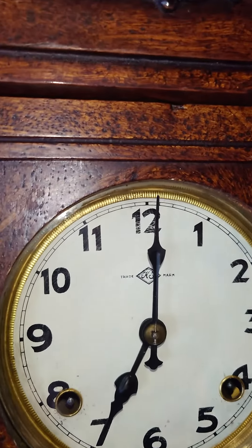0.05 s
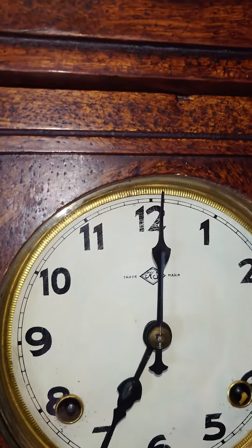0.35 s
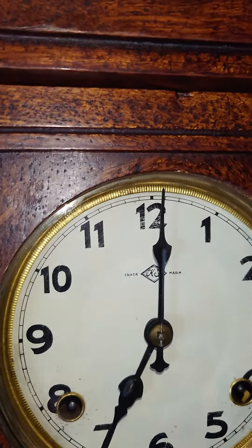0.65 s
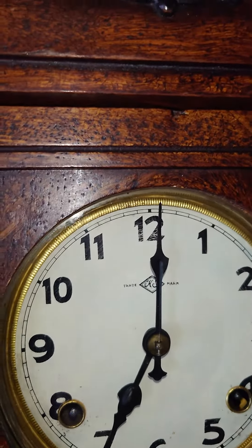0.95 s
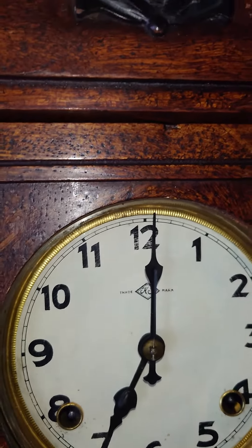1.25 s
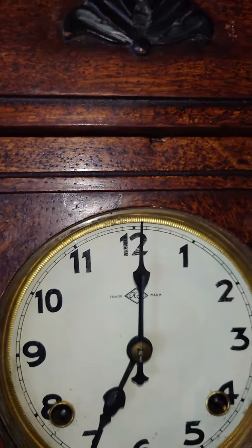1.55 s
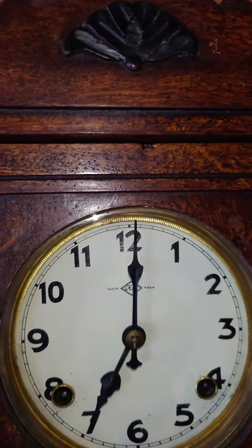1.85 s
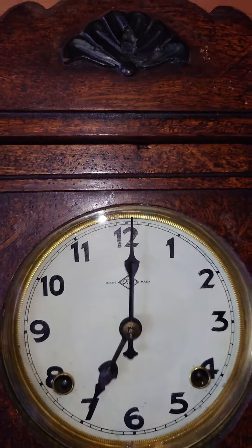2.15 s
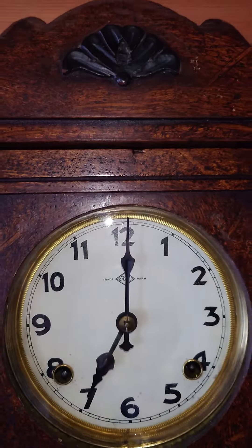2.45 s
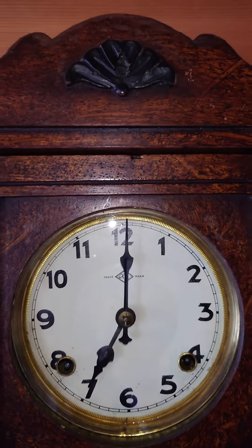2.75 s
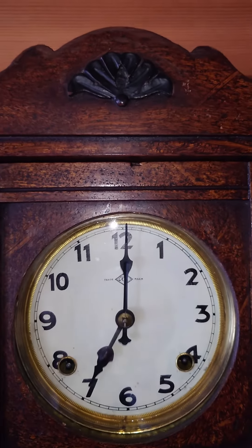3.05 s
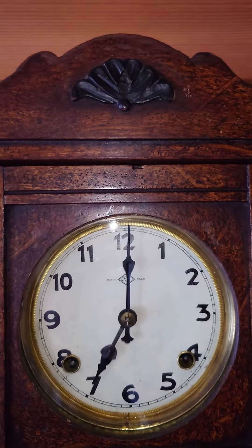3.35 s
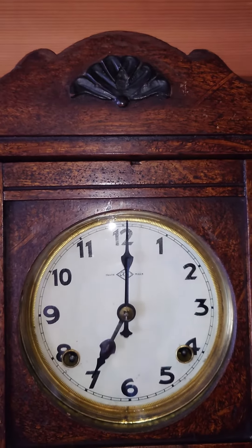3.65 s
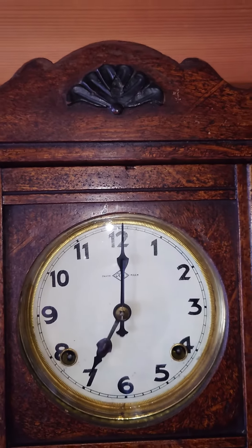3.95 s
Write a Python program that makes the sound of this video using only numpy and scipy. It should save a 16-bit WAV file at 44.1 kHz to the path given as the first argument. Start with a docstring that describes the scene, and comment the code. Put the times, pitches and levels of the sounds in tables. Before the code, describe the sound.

An old wall clock whirs, then strikes twice with ringing metallic tones.

```python
"""A small, quiet room, a stereo microphone close to an old wooden wall clock, a little to the right.
A lever drops, and the striking train spins up against its air brake and whirs, its teeth tapping
a steel pinion. A padded hammer strikes twice on the coiled wire gong: each blow knocks the case,
and the coil sizzles briefly and rings on with a long ladder of inharmonic partials."""
import sys
import numpy as np
from scipy import signal
from scipy.fft import rfft, irfft
from scipy.io import wavfile

SR = 44100
rng = np.random.default_rng(int(sys.argv[2]) if len(sys.argv) > 2 else 0)


def wav_out(sig):
    """Save sig, one row per channel (or a flat mono array), as 16-bit PCM at SR to the path in sys.argv[1]."""
    wavfile.write(sys.argv[1], SR, np.round(np.clip(np.atleast_2d(sig).T, -1, 1) * 32767).astype(np.int16))


N = 176400
TIME = np.arange(N) / SR
FREQS = np.fft.rfftfreq(2 * N, 1 / SR) + 1e-3
LEFT_LAG_S = 0.00029  # knock and ring reach the left microphone later


def from_db(db):
    """Decibels to gain."""
    return 10 ** (np.asarray(db) / 20)


def rms_one(x):
    """Scale to unit power."""
    return x / np.sqrt(np.mean(x ** 2) + 1e-20)


def at_hz(points, hz):
    """Read a spectrum on a log-frequency axis."""
    f, value = np.transpose(points)
    return np.interp(np.log(hz), np.log(f), value)


def pan(db):
    """Constant-power gains for the two microphones; db is left minus right."""
    gains = from_db(np.array([[.5], [-.5]]) * db)
    return gains / np.sqrt(np.mean(gains ** 2, axis=0))


def drift(rate):
    """Slow random motion of spread 1."""
    knots = rng.standard_normal(int(rate * N / SR) + 2)
    return rms_one(np.interp(TIME * rate, np.arange(len(knots)), knots))


def filtered(x, kind, hz, order):
    """Butterworth low-pass or high-pass."""
    return signal.sosfilt(signal.butter(order, hz, kind, fs=SR, output="sos"), x + 1e-18)


# diffuse sound, how alike at the two microphones: f/Hz, likeness/0-1
LIKENESS = [(30, 0.55), (200, 1), (700, 0.75), (1500, 0.11)]
def coloured(pair, db):
    """Give two unrelated noises a causal colour of unit power and the room's left-right likeness."""
    cepstrum = irfft(np.log(rms_one(from_db(db))))
    cepstrum[1:N] *= 2  # fold to minimum phase
    cepstrum[N + 1:] = 0
    mid, side = rfft(pair, 2 * N) * np.exp(rfft(cepstrum))
    alike = np.clip(at_hz(LIKENESS, FREQS), -1, 1)
    return irfft(np.sqrt((1 + alike) / 2) * mid + np.sqrt((1 - alike) / 2) * side * [[1], [-1]])[:, :N]


def room(x, tail_db, t60_s=0.63, dull_hz=5730):
    """The near walls add a dull, diffuse tail, 4 ms behind the direct sound."""
    tail = rng.standard_normal((2, N)) * from_db(-60 * TIME / t60_s) * (TIME > .004)
    tail = coloured(tail, -10 * np.log10(1 + (FREQS / dull_hz) ** 2))
    tail /= np.sqrt(np.sum(tail ** 2))
    return x + from_db(tail_db) * signal.fftconvolve(x, tail, axes=1)[:, :N]


# room tone: f/Hz, relative density/dB
AIR_COLOUR = [(20, 7), (140, -19.5), (200, -16.5), (400, -34), (1500, -16), (16000, -55)]
def room_tone(level_db=-81):
    """Still air all around the microphones: a faint, low noise."""
    return from_db(level_db) * coloured(rng.standard_normal((2, N)), at_hz(AIR_COLOUR, FREQS))


# levers and pins catching: t/s, level/dB, decay time/s
CLICKS = [(0.0226, -63, 0.044), (0.06, -51.5, 0.021), (0.383, -65, 0.021), (0.438, -51, 0.022),
          (1.267, -49, 0.014)]
# their colour: f/Hz, relative density/dB
CLICK_COLOUR = [(100, -39), (220, -9), (1300, 4), (2000, 2), (3400, -19.5), (6000, -9.5), (8500, -28.5),
                (16000, -43)]
def levers():
    """Each catch is a sudden, quickly dying rattle inside the case, just right of centre."""
    force = sum(from_db(db) * (TIME >= start) * np.exp(-np.abs(TIME - start) / decay_s)
                for start, db, decay_s in CLICKS)
    rattle = coloured(rng.standard_normal((2, N)) * force, at_hz(CLICK_COLOUR, FREQS))
    return room(rattle * pan(-2.5), tail_db=-19)


# the train spinning up against its air brake: t/s, tooth rate/Hz
TOOTH_RATE = [(.14, 38), (.21, 49), (.3, 81), (.45, 140), (.85, 197), (2, 205)]
def gear_train(wander=.015):
    """Relative speed of the train, and a pulse wherever a tooth engages or lets go."""
    rate = np.interp(TIME, *np.transpose(TOOTH_RATE), left=0)
    teeth = np.cumsum(rate * (1 + wander * drift(8))) / SR
    engage, release = (np.diff(np.floor(teeth + offset), prepend=0) for offset in (0, .5))
    return rate / rate.max(), engage, release


# the pinion's modes: f/Hz, relative level/dB
PINION_MODES = [(5350, -9.5), (5820, -4)]
# its ring, rising and falling with the load on the train: t/s, level/dB
PINION_LEVEL = [(.17, -107), (.25, -76), (.35, -82), (.39, -67), (.87, -59.5), (.92, -72), (1.06, -62.5),
                (1.275, -61), (1.29, -69.5), (1.6, -60), (3.6, -77)]
def pinion(engage, ring_s=.0011, scatter_db=1):
    """Each engaging tooth sets the small steel pinion ringing for a moment."""
    swell = TIME * np.exp(-np.minimum(TIME / ring_s, 20)) * (TIME < 20 * ring_s)
    ring = np.zeros((2, N))
    for hz, db in PINION_MODES:
        taps = engage * rng.choice([-1, 1], (2, N)) * from_db(db + scatter_db * rng.standard_normal(N))
        ping = swell * np.sin(2 * np.pi * hz * TIME)
        ring += signal.fftconvolve(taps, [ping], axes=1)[:, :N]
    level = from_db(np.interp(TIME, *np.transpose(PINION_LEVEL)))
    return room(rms_one(ring) * level, tail_db=-10)


# the whirring train: t/s, level/dB
WHIR_LEVEL = [(.14, -74), (.238, -58), (.25, -58), (.42, -52), (.6, -53.5), (.76, -50.5), (.96, -56),
              (1.15, -51.5), (1.277, -55.5), (1.29, -73), (1.338, -53), (1.35, -55), (1.6, -52),
              (2.86, -53), (3.45, -52), (3.6, -57.5)]
# colour of the clockwork: f/Hz, relative density/dB
WHIR_COLOUR = [(100, -66), (210, -16.5), (270, -27.5), (450, -19.5), (900, -13.5), (1400, -1.5), (1950, -8),
               (2700, -15), (3200, -24), (4500, -21.5), (6200, -15), (8300, -34), (9500, -25.5),
               (16000, -25)]
# its resonances: f/Hz, width/Hz, lift/dB
WHIR_RESONANCES = [(835.7, 62, 14), (1042, 35, 11), (1264, 22.5, 15), (1847, 43.6, 14), (4680, 70, 10),
                   (7455, 460, 19.5)]
# where it sits between the microphones: f/Hz, left minus right/dB
WHIR_PAN = [(600, -1.5), (850, -11), (1600, -7.5), (2600, -1.5), (3700, -4), (6500, -6.5), (7500, -14),
            (14000, -5)]
def whir(speed, engage, release, tooth_ring_s=.0014, rubbing=.35, hiss_above_hz=6400):
    """Gear teeth tick ever faster until they blur; rubbing and hiss grow with speed."""
    release_db, scatter_db, flutter_db = -2.5, 2.5, 2.5
    contacts = (engage + from_db(release_db) * release) * from_db(scatter_db * rng.standard_normal(N))
    ticks = signal.lfilter([1], [1, -np.exp(-1 / (tooth_ring_s * SR))], contacts + 1e-18)
    force = rms_one(ticks + rubbing * speed)
    level = from_db(np.interp(TIME, *np.transpose(WHIR_LEVEL)) + flutter_db * drift(60))
    peaks_db = sum(db / (1 + (2 * (FREQS - hz) / width) ** 2) for hz, width, db in WHIR_RESONANCES)
    gears = coloured(rng.standard_normal((2, N)) * force * level, at_hz(WHIR_COLOUR, FREQS) + peaks_db)
    spectrum = rfft(gears, 2 * N) * pan(at_hz(WHIR_PAN, FREQS))
    treble = 1 / (1 + (hiss_above_hz / FREQS) ** 20)
    body = irfft(spectrum * (1 - treble))[:, :N]
    hiss = speed ** 1.94 * irfft(spectrum * treble)[:, :N]
    return room(body + hiss, tail_db=-1.5)


# hammer blows, also driving sizzle and gong: t/s, ring gain/dB, knock gain/dB
STROKES = [(1.6072, 1, -3.5), (2.9049, 1, -5)]
# modes of the wooden case: f/Hz, level/dB, t60/s
CASE_MODES = [(489, -33, 0.4), (548, -29.5, 0.11), (1143, -20, 0.064), (1247, -19.5, 0.12),
              (2940, -35, 0.039)]
def knock(rebound_s=.103, rebound_db=-7):
    """The blow thumps the wooden case; the hammer then drops back on its rest with a duller bump."""
    wood = sum(from_db(db - 60 * np.minimum(TIME / t60, 10)) * np.sin(2 * np.pi * hz * TIME)
               for hz, db, t60 in CASE_MODES)
    blow = filtered(wood, "high", hz=351, order=4)
    bump = from_db(rebound_db) * filtered(blow, "low", hz=660, order=2)
    out = np.zeros((2, N))
    for start, _, db in STROKES:
        t = TIME - start - np.array([[LEFT_LAG_S], [0]])
        out += from_db(db) * (np.interp(t, TIME, blow) + np.interp(t - rebound_s, TIME, bump))
    return room(out * pan(-3.5), tail_db=-9.5)


TREBLE_RISE_S, TREBLE_PAN_DB = 0.00066, -4  # the top of the coil's sound: quick, and to the right
# the coil's metallic sizzle: f/Hz, relative density/dB
SIZZLE_COLOUR = [(200, -14.5), (500, 13.5), (2700, 9), (3700, -8), (5200, -2), (7500, -18), (11500, -16),
                 (14500, -4), (16000, -2)]
def sizzle(flare_db=-39, flare_t60_s=1.15, tick_db=-49, tick_t60_s=.2):
    """The contact spits a bright tick; countless weak vibrations of the coil flare up and die early."""
    starts, _, knock_db = np.transpose(STROKES)[:, :, None]
    ages = np.maximum(TIME - starts, 0)
    rise = 1 - np.exp(-ages / TREBLE_RISE_S)
    flare = np.sum(rise * from_db(flare_db - 60 * ages / flare_t60_s), axis=0)
    contact = np.sum(rise * from_db(tick_db + knock_db - 60 * ages / tick_t60_s), axis=0)
    tick = filtered(rng.standard_normal((2, N)) * contact, "high", hz=13500, order=6)
    shimmer = coloured(rng.standard_normal((2, N)) * flare, at_hz(SIZZLE_COLOUR, FREQS))
    return (tick + shimmer) * pan(TREBLE_PAN_DB)


# the coil's two runs of ever wider spaced high partials: first f/Hz, step/Hz, widening/Hz
LADDER_RUNS = [(7032, 221.8, 1.571), (11886, 301, 0.9)]
# their strength before random scatter: f/Hz, level/dB
LADDER_LEVEL = [(7000, -68), (8200, -71), (9100, -62), (11900, -67), (14400, -57), (15600, -60)]
def high_partials(count=14):
    """Further rows of coil modes, uneven in strength: the higher, the shorter they ring."""
    k = np.arange(count)
    runs = []
    for first_hz, step_hz, widening_hz in LADDER_RUNS:
        hz = first_hz + step_hz * k + widening_hz * k ** 2
        side_db, uneven, restrike_db = 7 * rng.uniform(-3.1, 1, (3, count))
        db = at_hz(LADDER_LEVEL, hz) + uneven / 2
        t60 = 2.4 * (hz / LADDER_LEVEL[0][0]) ** -1.2
        runs.append(np.transpose([hz, db, t60, TREBLE_PAN_DB + side_db, restrike_db - 3]))
    return np.vstack(runs)


# modes of the coil: f/Hz, level/dB, t60/s, left minus right/dB, change if struck while ringing/dB
COIL_MODES = [(443, -48, 2, -7, -4), (507.7, -43, 1.4, -12, -2), (577.1, -40, 5, -3, 0),
              (650.7, -51, 2.9, -8, -1), (728.3, -55, 3.8, -6, -1), (893.3, -46, 9.7, -13, 2),
              (981.8, -42, 8.5, -8, -1), (1076, -39, 5.5, -12, 1), (1153.6, -49, 1.8, -6, 0),
              (1173.6, -42, 4, -8, 4), (1271.9, -30, 2.1, -14, -5), (1378.1, -37, 3.7, -20, -13),
              (1488.1, -44, 5.1, -3, -5), (1597.8, -51, 7, -2, -14), (1712.4, -44, 6.1, -11, -1),
              (1831.7, -50, 9.5, 4, 5), (1954.3, -55, 12, -5, 0), (2083, -52, 6.5, -18, 3),
              (2212.5, -45, 6.3, -7, -4), (2347.1, -57, 6.4, -4, 3), (2485.7, -55, 5.5, -2, 5),
              (2626.2, -51, 5.4, 1, 6), (2771.6, -48, 5.5, 3, 0), (2917.9, -50.5, 3.6, -1, -15),
              (3071.7, -43.5, 2.2, 16, 1.5), (3225.9, -51, 4.9, 9, 0), (3387.3, -60, 5, -5, -3),
              (3547.8, -53, 2.9, -1, -5), (3714.5, -59, 3.2, -5, -6), (3886.1, -59, 4.4, -16, -4),
              (4059.2, -61, 4.7, -13, 0), (4235, -60, 6, -4, 0), (4412, -59.5, 3, 2, 6),
              (4595, -59, 4.9, -3, -6), (4783, -57, 6, 3, -1), (4971, -58, 2.2, -4, -1),
              (5162, -58, 3.8, 1, 0), (5361, -49, 1.9, 0, -21), (5760, -59, 3.4, -5, -7),
              (6171, -61, 6, -1, -10), (6382, -57, 3.6, 7, -1), (6813, -60, 3.3, -3, -15)]
def gong(damping_s=0.015, bloom_s_at_1khz=0.0081, bloom_below_hz=11000):
    """Each blow stops the old ring and starts anew; higher partials bloom later, the topmost at once."""
    modes = np.vstack([COIL_MODES, high_partials()])
    ends = [start for start, _, _ in STROKES[1:]] + [N / SR]
    out = np.zeros((2, N))
    for k, ((start, ring_db, _), end) in enumerate(zip(STROKES, ends)):
        span = slice(int(start * SR), int((end + 10 * damping_s) * SR))
        t = np.maximum(TIME[span] - start - np.array([[LEFT_LAG_S], [0]]), 0)
        damped = np.exp(-np.maximum(TIME[span] - end, 0) / damping_s)
        for hz, db, t60, side_db, restrike_db in modes:
            rise_s = bloom_s_at_1khz * np.sqrt(hz / 1000) if hz < bloom_below_hz else TREBLE_RISE_S
            bloom = 1 - np.exp(-t[1] / rise_s)
            level = from_db(ring_db + db + restrike_db * (k > 0) - 60 * t[1] / t60)
            out[:, span] += pan(side_db) * (level * bloom * damped) * np.sin(2 * np.pi * hz * t)
    return out


def scene():
    """Room tone behind, the running clockwork nearer, the two strokes in front."""
    background = room_tone()
    speed, engage, release = gear_train()
    strokes = gong() + sizzle() + knock()
    clockwork = whir(speed, engage, release) + pinion(engage) + levers()
    return background + clockwork + strokes


def record(dry):
    """Both microphone channels are cut steeply above 15850 Hz."""
    return signal.sosfilt(signal.ellip(12, .1, 80, 15850, fs=SR, output="sos"), dry)


dry = scene()
out = record(dry)
wav_out(out)
```